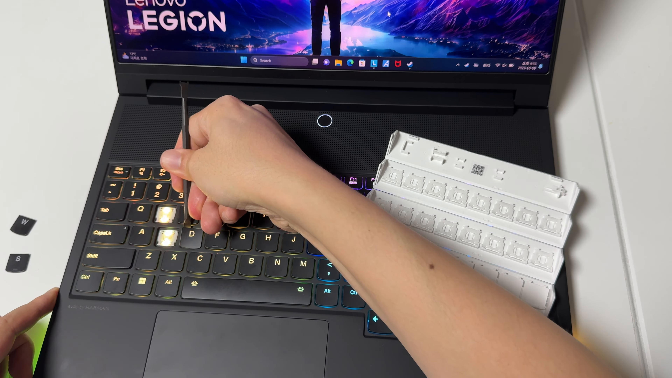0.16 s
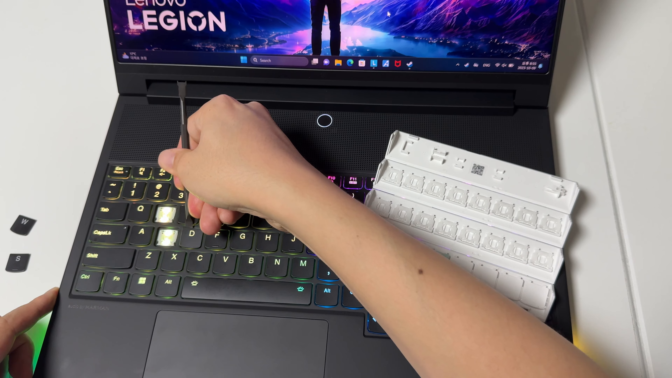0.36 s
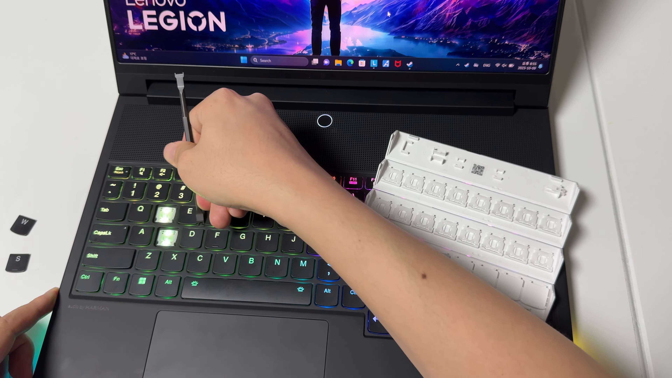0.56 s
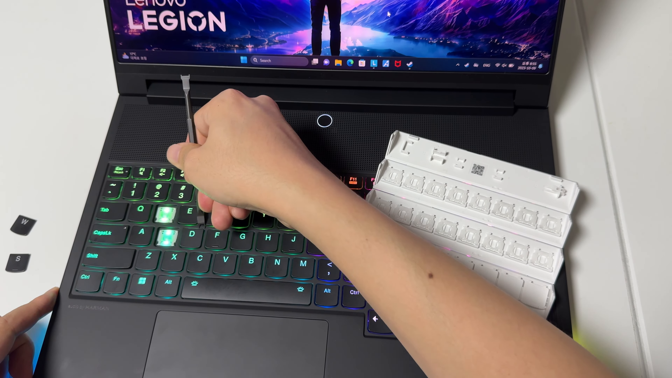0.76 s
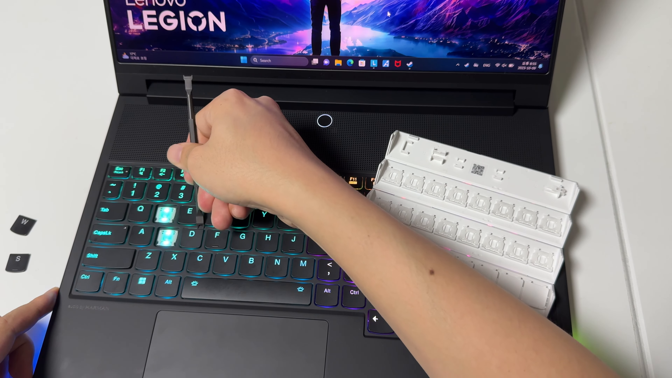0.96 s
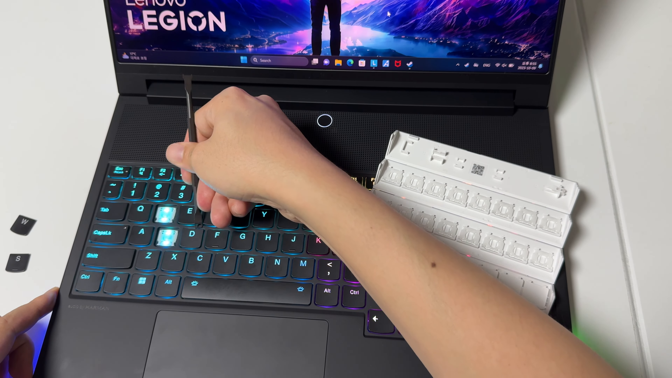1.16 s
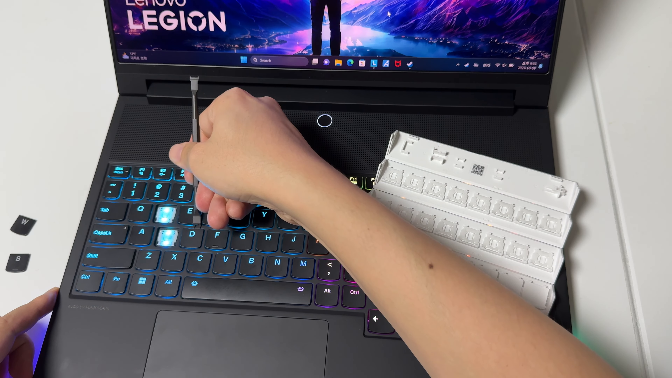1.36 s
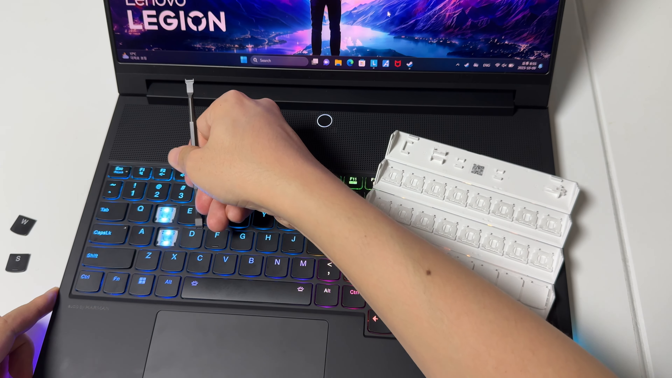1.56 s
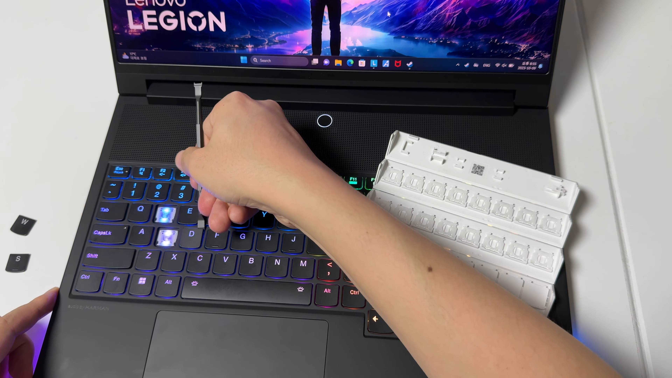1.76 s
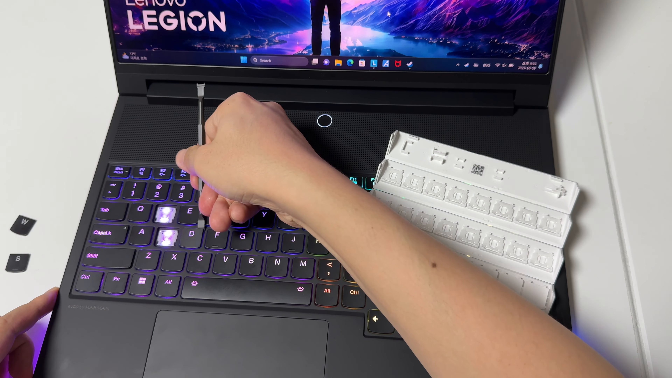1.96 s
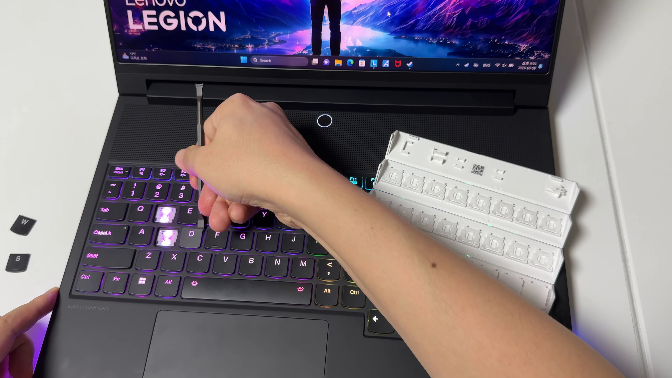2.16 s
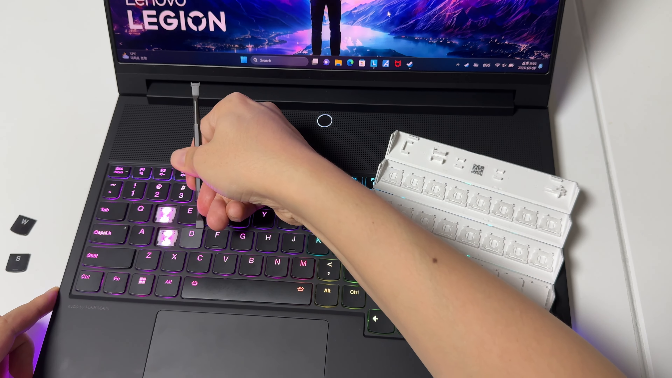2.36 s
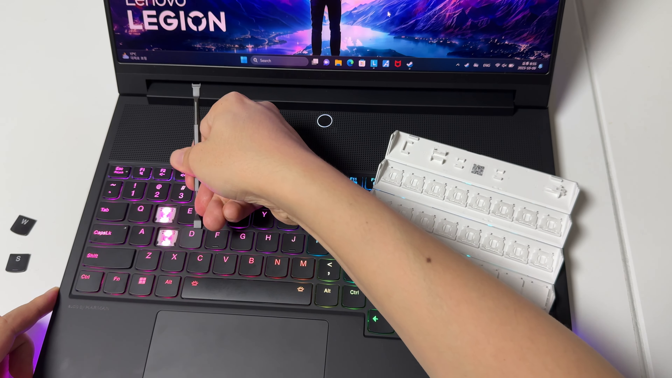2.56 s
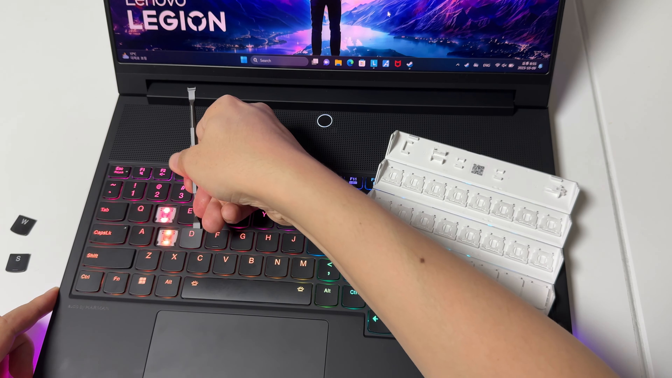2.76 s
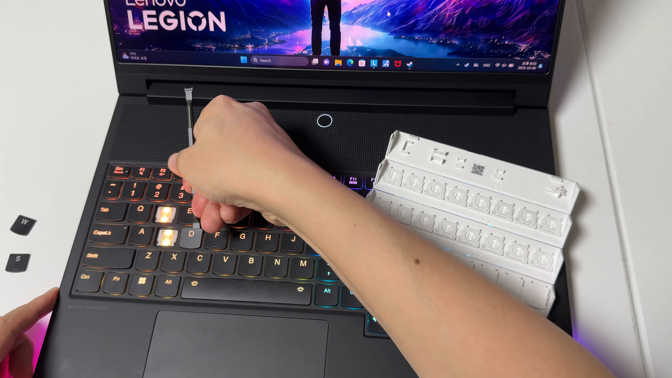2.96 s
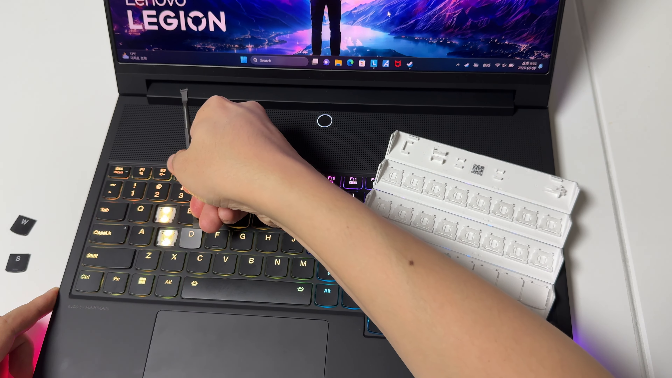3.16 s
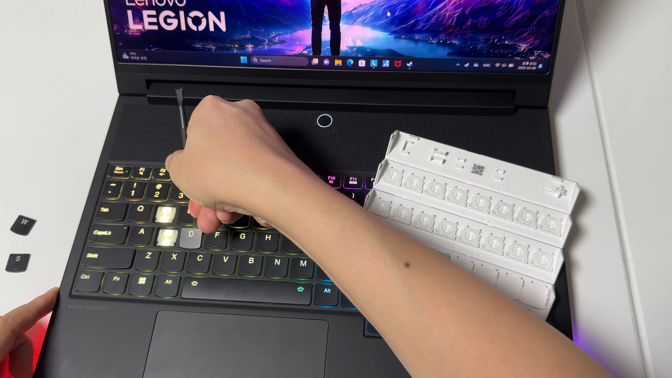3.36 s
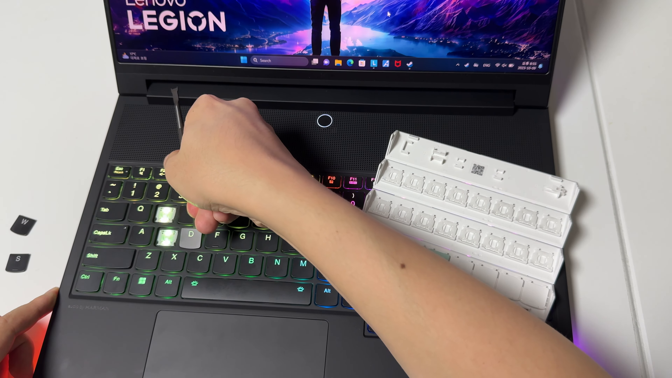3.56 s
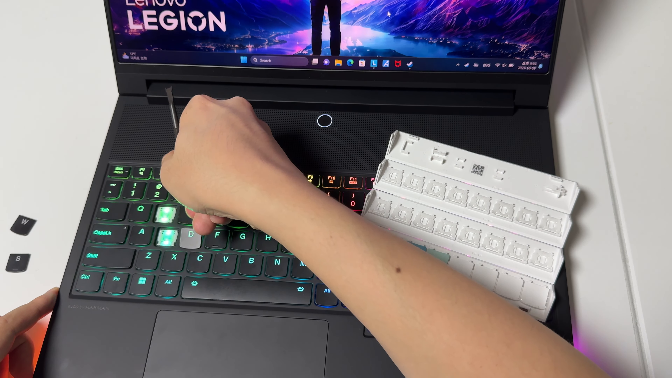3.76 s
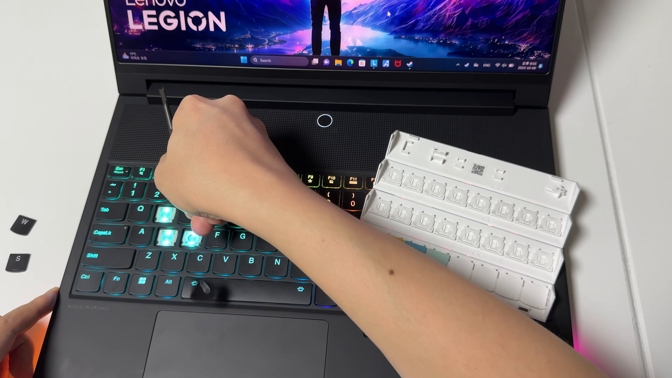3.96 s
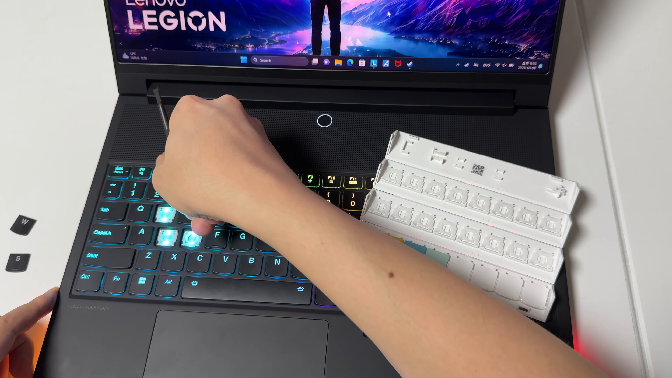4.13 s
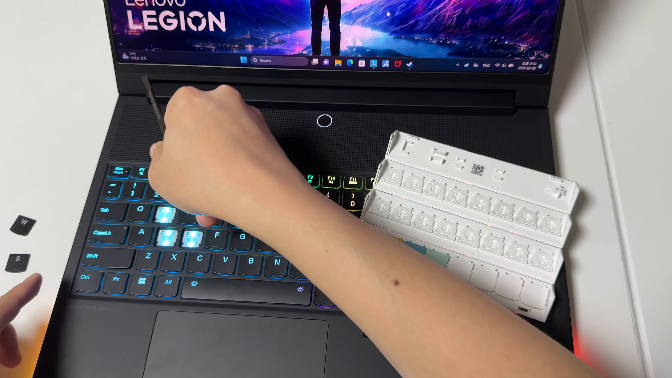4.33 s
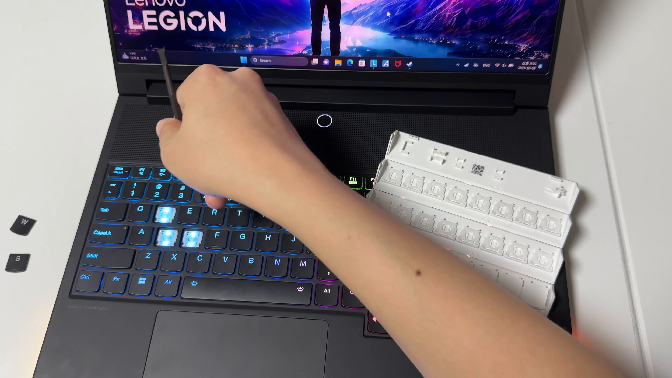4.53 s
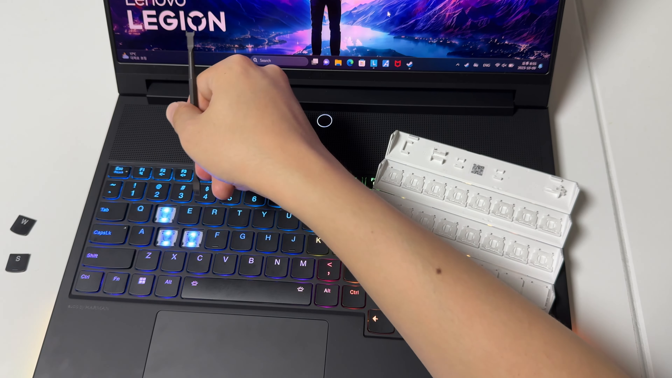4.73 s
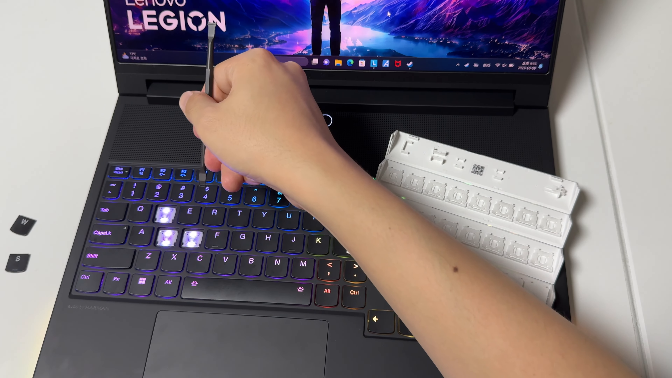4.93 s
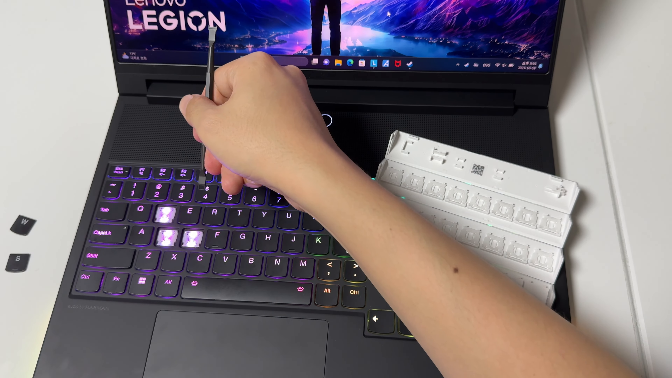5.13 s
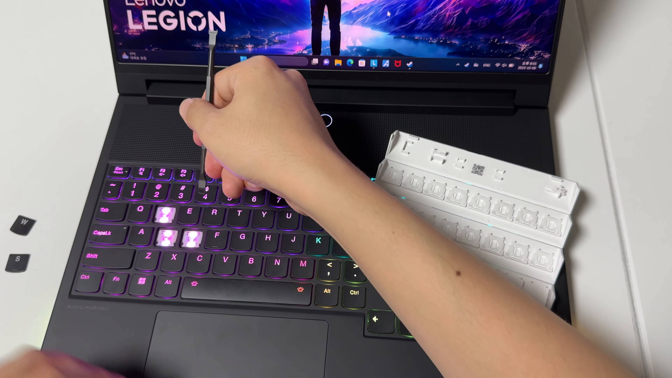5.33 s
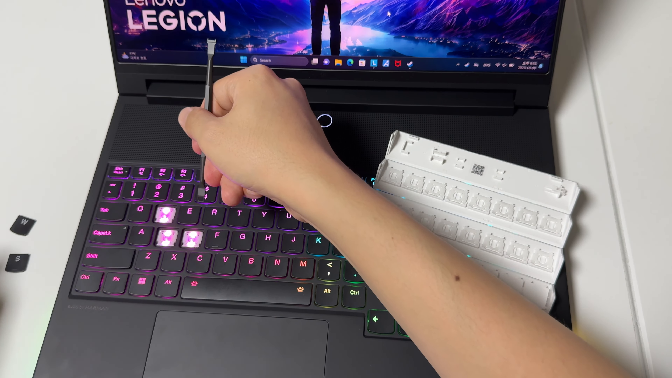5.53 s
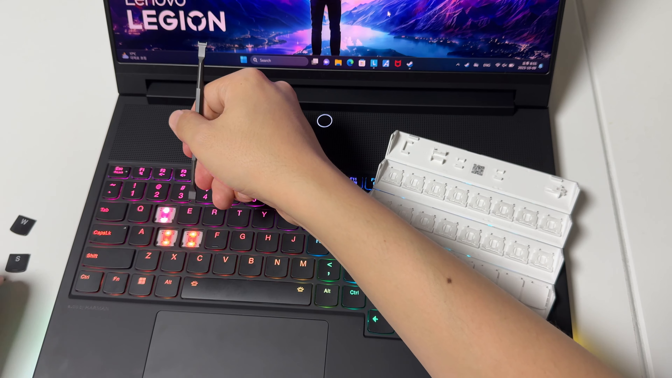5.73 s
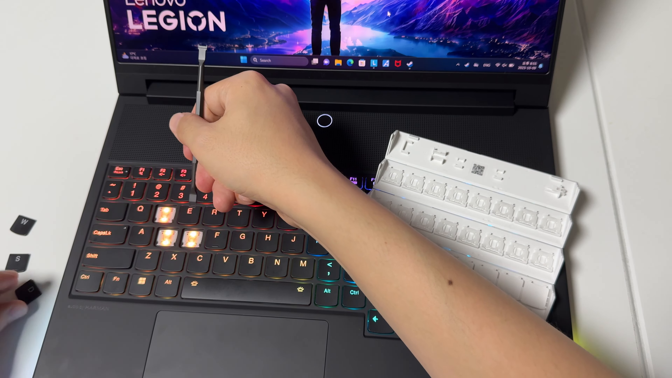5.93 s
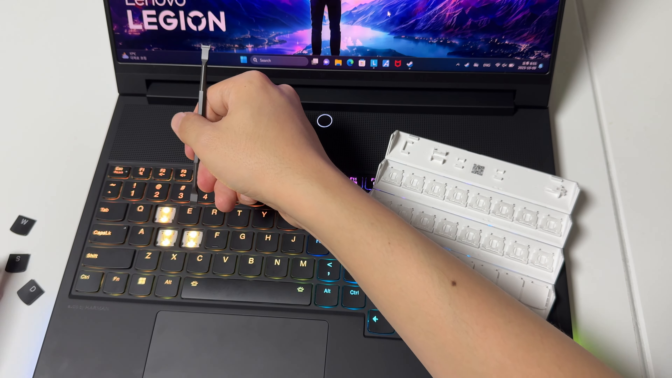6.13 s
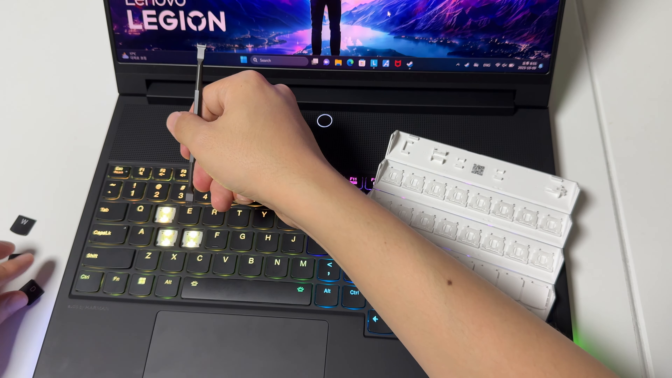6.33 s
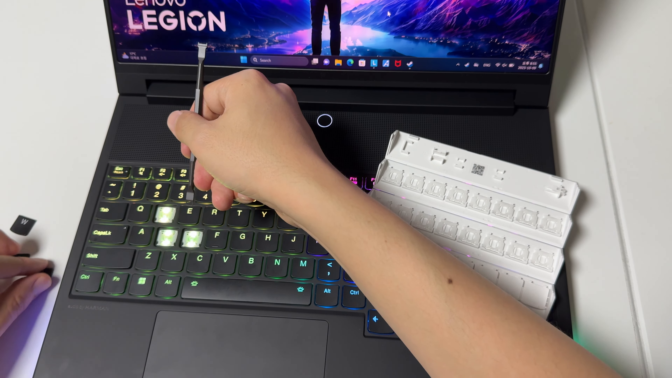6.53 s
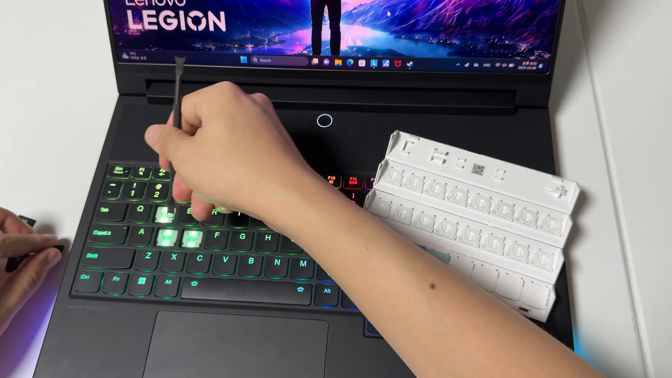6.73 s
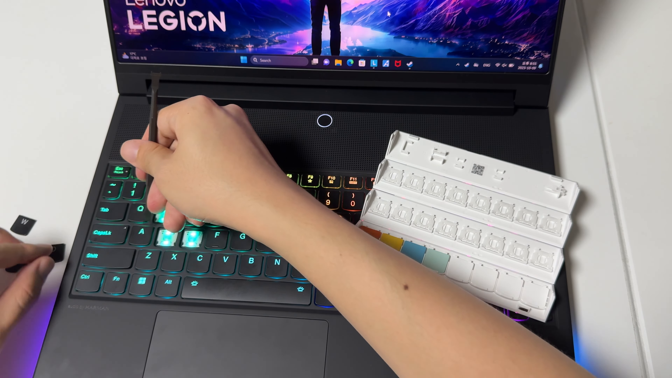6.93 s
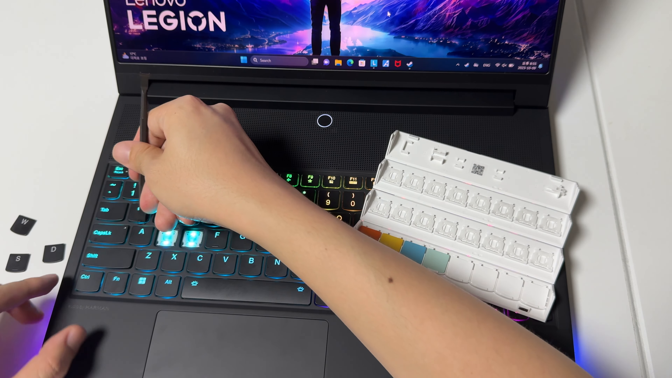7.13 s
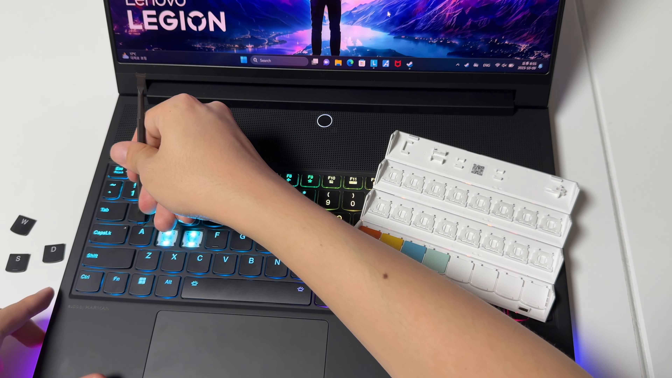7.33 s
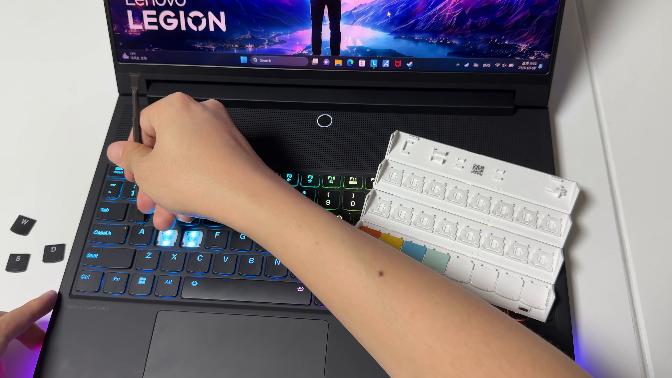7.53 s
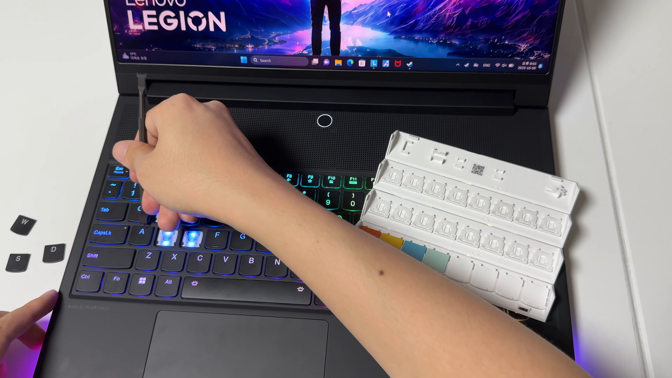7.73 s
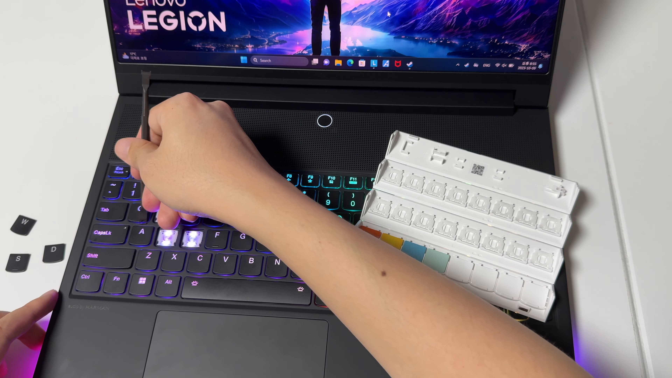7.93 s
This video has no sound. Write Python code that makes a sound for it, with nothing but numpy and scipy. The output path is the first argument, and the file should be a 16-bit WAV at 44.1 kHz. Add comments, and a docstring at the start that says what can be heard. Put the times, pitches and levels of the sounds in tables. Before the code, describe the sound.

Bright plastic clips crack loose in a small quiet room, a light keycap bounces and is later set down and slid, above low fan noise.

```python
"""Keycaps pried off a laptop

A thin steel tool pries keycaps off in a small room: noise ticks ring the keys, plastic clips snap, the deck knocks.
One freed cap bounces over the palm rest, is dropped on the desk and slid aside with a squeak.
Hand pushes and knocks rock the case (low damped modes), strokes brush it (coloured noise); a fan and mains hum run.
Two close microphone ports hear each impact directly and through a tail of fading noise from the room."""
import sys
import numpy as np
from scipy import signal
from scipy.fft import rfft, irfft, next_fast_len
from scipy.io import wavfile
from scipy.ndimage import uniform_filter1d, map_coordinates

SR = 44100
rng = np.random.default_rng(int(sys.argv[2]) if len(sys.argv) > 2 else 0)


def master_out(mix):
    """Clip the mix to full scale and print it as 16-bit PCM to the path in sys.argv[1]."""
    frames = np.transpose(np.atleast_2d(mix))
    ceiling = np.clip(frames, -1, 1)
    pcm = np.round(ceiling * 32767).astype(np.int16)
    wavfile.write(sys.argv[1], SR, pcm)


N = 352359  # length in samples
HIT = np.arange(SR // 3) / SR  # clock of one short sound, s

# Event levels are relative: each function adds its own gain.
# Clips letting go: start_s, level_db, brightness_db_per_octave, knock_db, favoured_deck_pitch_hz,
# key_ring_db, favoured_key_pitch_hz, clip_ring_db, favoured_clip_pitch_hz
CLIP_SNAPS = [(0.0975, -7, 2.5, -28, 1330, -8, 6410, -7, 9800),
              (1.4444, -40.5, -0.5, -48, 398, -10.5, 6200, 0, 13500),
              (1.7876, -22, 0.5, -43, 2430, -9, 5530, 3, 13400),
              (3.9189, -9.5, -0.5, -28.5, 2430, -6, 5840, -1, 13320),
              (5.328, -29, 2.5, -60, 2400, -7, 7720, 0, 11700)]
# The tool tip ticking on keys: start_s, level_db, brightness_db_per_octave, knock_db,
# favoured_deck_pitch_hz, key_ring_db
TOOL_TICKS = [(0.3565, -48, 1.5, -45, 675, -27), (0.44, -58, -9, -57, 700, -23),
              (0.4521, -59, -7, -49, 770, -20), (0.9898, -47.5, -2.5, -53.5, 2050, -19),
              (1.272, -51, -2.5, -50, 720, -22), (1.5285, -52.5, 6, -55, 300, -17),
              (1.724, -61, -7.5, -50, 396, -17), (2.6169, -52, 0.5, -53.5, 700, -17),
              (4.724, -51, -7, -73, 500, -12), (4.745, -48.5, -5, -55.5, 500, -9),
              (4.897, -59.5, -9, -67, 700, -1), (4.9068, -64.5, -8, -76, 696, 4),
              (5.081, -53.5, -5.5, -67, 1800, -5), (5.165, -47, 0, -81, 700, -13),
              (5.7487, -50.5, -15.5, -55, 500, 0.5), (6.4097, -57, -3, -56.5, 2040, -22),
              (6.7229, -48, -4, -72, 696, -4.5), (7.9032, -49.5, -0.5, -74, 701, -10)]
# Corners of the loose cap landing, on the laptop and later on the desk: start_s, level_db,
# brightness_db_per_octave, shell_ring_db, favoured_shell_pitch_hz
CAP_LANDINGS = [(4.0328, -27, 0, 6.5, 5760), (4.0386, -21, 2, 8, 12830), (4.0422, -23, 2.5, 9, 15470),
                (4.1082, -31.5, -7.5, -10, 5835), (4.1119, -28.5, -1.5, 12, 14080),
                (4.187, -26, 0.5, 8, 15470), (4.1944, -22.5, -1, 5.5, 12470), (4.197, -21, 1, 3.5, 15470),
                (4.207, -28, -1, 5, 15470), (4.2415, -37, 3, 1, 14080), (4.2483, -31, -5, 3, 15470),
                (4.2538, -29, -1.5, 5, 11400), (4.259, -41, -2.5, 13, 14080), (4.269, -43, 0, 10, 14080),
                (4.2839, -24, 4, -6, 15470), (4.2957, -52, 1, 1, 4450), (4.3083, -41.5, -7.5, -1, 4450),
                (4.3216, -37.5, -4, -9, 5835), (4.424, -54.5, -7, 5, 12600),
                (5.9194, -47.5, -5.5, 11.5, 6000), (5.926, -26, -2.5, -6, 3870),
                (5.9289, -50.5, -7.5, 20, 12800), (5.951, -45, -8, 3.5, 5835), (5.968, -44.5, -1, 2, 5835),
                (6.786, -54, -8, 0, 4450), (6.7908, -35, -4, 0.5, 11700), (6.794, -42, -4, 3, 5500),
                (6.814, -39, -6, -6, 5200), (6.8175, -36.5, -1, -2, 11700), (6.825, -42.5, -3, 2, 4900)]
# Colour of a sharp contact, as in a clip's crack: pitch_hz, level_db
CRACK_COLOUR = [(200, -38), (1000, -26), (1800, -19), (2800, -13), (3850, -16.5), (4900, -10.5),
                (6400, -10.5), (7600, -8.5), (9000, -3), (10000, 2), (11800, -4), (13000, -3.5),
                (15500, -5.5), (17000, -19.5)]
# Ringing of a key still in its seat: pitch_hz, level_db, fade_by_60_db_s
KEY_MODES = [(3080, -10, .008), (3700, -13, 0.0058), (4647, -11, .007), (5090, -1.5, 0.0061),
             (5940, -1.5, 0.0054), (6400, -1, 0.0066), (7050, -4.5, 0.0054), (7740, -4.5, .005)]


def amp(db):
    """Decibels to gain."""
    return 10 ** (np.asarray(db) / 20)


def unit(x):
    """Scale to an rms of 1."""
    return x / np.sqrt(np.mean(x ** 2) + 1e-20)


def unit_energy(x):
    """Scale to a summed square of 1."""
    return x / np.sqrt(np.sum(x ** 2) + 1e-20)


def along(points, hz):
    """Read a curve of (pitch_hz, value) points on a log pitch axis."""
    point_hz, value = np.transpose(points)
    return np.interp(np.log(hz + 1), np.log(point_hz), value)


def filtered(x, response):
    """Multiply the spectrum of x by a response that depends on frequency."""
    length = x.shape[-1]
    padded = next_fast_len(length + 2048)
    spectrum = rfft(x, padded) * response(np.fft.rfftfreq(padded, 1 / SR))
    return irfft(spectrum, padded)[..., :length]


def coloured(x, spectrum, tilt=0, size=2048):
    """Colour x without any sound ahead of its cause; tilt is in dB per octave, flat below 1 kHz."""
    hz = np.fft.rfftfreq(size, 1 / SR)
    level_db = along(spectrum, hz) + tilt * np.log2(np.maximum(hz, 1000) / 8000)
    # folding the cepstrum forward makes the filter minimum phase
    cepstrum = irfft(np.log(amp(level_db)))
    cepstrum[1:size // 2] *= 2
    cepstrum[size // 2 + 1:] = 0
    impulse = irfft(np.exp(rfft(cepstrum)))
    return signal.fftconvolve(x, impulse)[:len(x)]


def wobble(rate):
    """A smooth random curve through rate random points a second."""
    knots = rng.standard_normal(int(N * rate / SR) + 4)
    return map_coordinates(knots, [np.arange(N) * rate / SR])


def add(track, s, sound):
    """Mix a stereo sound into the track at s seconds."""
    start = max(round(s * SR), 0)
    track[:, start:start + sound.shape[1]] += sound[:, :max(N - start, 0)]


def ring(modes, scatter_db, attack, tilt=0, strike_hz=1, width_hz=1, favour_db=0):
    """Fading tones of unit total energy; the point of impact favours those near strike_hz."""
    hz, db, t60 = np.transpose(modes)[:, :, None]
    strength_db = db + tilt * np.log2(hz) + scatter_db * rng.standard_normal(hz.shape)
    strength_db = strength_db + favour_db * np.exp(-((hz - strike_hz) / width_hz) ** 2)
    phase = 2 * np.pi * (hz * HIT + rng.random(hz.shape))
    fading = amp(strength_db - 60 * HIT / t60)
    swelling = 1 - np.exp(-HIT / attack)
    return unit_energy((fading * np.sin(phase) * swelling).sum(0))


def contact(spectrum, tilt, t60, attack, click_db):
    """A sharp release plus brief noise, evened in spectrum and then coloured; of unit energy."""
    envelope = amp(-60 * HIT / t60) * (1 - np.exp(-(HIT / attack) ** 2))
    push = unit_energy(rng.standard_normal(len(HIT)) * envelope)
    push[int(2 * attack * SR)] += amp(click_db)  # a click of one sample
    z = rfft(push)
    smooth_power = np.abs(uniform_filter1d(np.abs(z) ** 2, size=200))
    even = irfft(z / np.sqrt(smooth_power + 1e-12), len(HIT))
    even = even * (HIT < HIT[-1] / 2)  # drop what wraps round to the end
    return unit_energy(coloured(even, spectrum, tilt))


def all_round(spectrum, tilt):
    """A contact as the walls receive it: summed over all directions, its spectrum is smooth."""
    return unit_energy(coloured(signal.unit_impulse(len(HIT)), spectrum, tilt))


def bending(x):
    """Bending waves cross the deck more slowly the lower they are, so a knock falls in pitch."""
    lag_cycles = 1.0  # delay in s is lag_cycles / (hz + 100)
    return filtered(x, lambda hz: np.exp(-2j * np.pi * lag_cycles * np.log1p(hz / 100)))


def diffuse(pair, spectrum):
    """Turn two unrelated signals into sound from all around, most alike at the ports in the bass."""
    # left-right likeness: pitch_hz, correlation (1 alike, 0 unrelated, below 0 opposed)
    likeness = [(70, 0.73), (140, 1), (300, 0.31), (550, -0.24), (1200, -0.07), (4000, 0)]
    # balance of the ports: pitch_hz, left_minus_right_db
    balance = [(100, 0.43), (300, 2.5), (5000, 3.2), (12000, 0.93)]

    def mid_side(hz):
        angle = np.arccos(np.clip(along(likeness, hz), -1, 1)) / 2
        return amp(along(spectrum, hz)) * [np.cos(angle), np.sin(angle)]

    mid, side = filtered(pair, mid_side)
    ports = np.array([mid + side, mid - side])
    return filtered(ports, lambda hz: amp(np.outer([.5, -.5], along(balance, hz))))


def direct(x, shade):
    """The straight path to the two ports; the hand shades the right one."""
    # level difference, multiplied by shade: pitch_hz, left_minus_right_db
    shadow = [(150, 2.5), (1000, 1.1), (2000, 8), (3500, 5.2), (6000, 5.5), (8000, 5), (9500, 1.8),
              (12000, 1)]
    # phase difference: pitch_hz, left_lead_radians
    lead = [(1000, 0), (5000, -.3), (8000, -2.7), (9500, -3.4), (16000, -5.7)]

    def port(hz, side):
        return amp(side * shade * along(shadow, hz)) * np.exp(1j * side * along(lead, hz))

    return filtered(x, lambda hz: np.array([port(hz, .5), port(hz, -.5)]))


def room(x):
    """Echoes from desk and walls: a fresh noise tail that fades at its own pace in each band."""
    # fading time: pitch_hz, fade_by_60_db_s
    fade = [(150, 0.5), (1000, 0.28), (5000, 0.23), (15000, 0.2)]
    # colour of the tail: pitch_hz, level_db
    tail_colour = [(150, -3), (1200, -0.5), (2400, 1), (3600, -3.5), (5200, -2), (6500, -1), (7700, -6.5),
                   (9000, -18.5), (15000, -14.5)]
    hz, t, z = signal.stft(rng.standard_normal((2, len(HIT))), SR, nperseg=256)
    z = z * amp(-60 * t / along(fade, hz)[:, None])
    tail = signal.istft(z, SR, nperseg=256)[1][:, :len(HIT)]
    tail = np.sqrt(2) * unit_energy(tail * (1 - np.exp(-HIT / 0.00094)))
    echoes = signal.fftconvolve(x[None], tail, axes=1)[:, :len(x)]
    return diffuse(echoes, tail_colour)


def fan():
    """Steady air noise from all around, with slightly unsteady mains and motor tones."""
    # colour of the air noise: pitch_hz, level_db_per_hz (relative)
    air_colour = [(20, -35), (30, -15.5), (42, 0), (120, 1), (240, 0), (315, 6.5), (420, -3.5), (620, -4),
                  (770, -10), (910, -7), (1400, -15), (2200, -22), (5300, -37.5), (7200, -27.5),
                  (9300, -48.5), (12500, -41.5), (16000, -55)]
    # tones: pitch_hz, level_db, drift_radians
    hum_tones = [(121.9, -70.5, 0.29), (293.7, -68.5, 0.38), (348, -75.5, 1)]
    air_level = amp(-61.0 + 0.47 * wobble(5.0))
    air = air_level * unit(diffuse(rng.standard_normal((2, N)), air_colour))
    t = np.arange(N) / SR
    tones = np.zeros(N)
    for hz, db, drift in hum_tones:
        level = np.sqrt(2) * amp(db + 2 * drift * wobble(1.9))  # sqrt(2) turns rms into peak
        tones += level * np.sin(2 * np.pi * hz * t + drift * wobble(8))
    return air + direct(tones, shade=0.93)


def rubs():
    """Strokes of fingers, tool tip and skidding cap: tiny slips of uneven size under a smooth swell."""
    # strokes: middle_s, length_s, level_db, brightness_db_per_octave
    strokes = [(1.002, 0.088, -70, -15.5), (1.416, 0.055, -73, 0), (1.488, 0.12, -80, 2),
               (2.363, 0.037, -74, 0), (4.39, 0.18, -73, -4), (4.75, 0.086, -68.5, -2.5),
               (5.106, 0.068, -71, 7), (5.154, 0.036, -68, 1.5), (5.96, 0.057, -59, -1),
               (6.438, 0.28, -75, -12.5), (6.624, 0.18, -73.5, -6), (7.262, 0.072, -71.5, 4.5),
               (7.72, 0.052, -71.5, 2), (7.877, 0.097, -74.5, 5)]
    # colour of skin and plastic sliding: pitch_hz, level_db
    rub_colour = [(300, -0.5), (1500, -3.5), (4000, 5.5), (8000, -1.5), (11000, 6), (15000, 6), (17000, -8)]
    # the tip also scrapes over the key around each contact; lag is to the middle of the scrape
    scrape_db, scrape_s, scrape_lag_s = -82, .06, 0.022
    scrapes = [(s + scrape_lag_s, scrape_s, scrape_db, tilt) for s, _, tilt, *_ in CLIP_SNAPS + TOOL_TICKS]
    track = np.zeros((2, N))
    for middle, length, db, tilt in strokes + scrapes:
        slips = rng.standard_normal(len(HIT)) * amp(5.2 * rng.standard_normal(len(HIT)))
        swell = np.sin(np.pi * np.minimum(HIT / length, 1))
        stroke = swell * unit(coloured(slips, rub_colour, tilt))
        add(track, middle - length / 2, amp(db) * (direct(stroke, shade=1.0) + amp(1.0) * room(stroke)))
    return track


def snaps():
    """A clip lets go with a crack of a few milliseconds; clip and key ring briefly, also into the room."""
    # the tiny plastic clips under a key: pitch_hz, level_db, fade_by_60_db_s
    clip_modes = [(9700, 0, .004), (11600, -3, .004), (13000, -2, .005), (13600, -3, .005),
                  (14950, -2, .004)]
    ring_send_db = -8.5  # how much of the ringing reaches the walls
    track = np.zeros((2, N))
    for s, db, tilt, _, _, key_db, key_hz, clip_db, clip_hz in CLIP_SNAPS:
        crack = contact(CRACK_COLOUR, tilt, t60=0.0043, attack=0.0004, click_db=-1.0)
        key = amp(key_db) * ring(KEY_MODES, scatter_db=0.5, attack=0.0004,
                                 strike_hz=key_hz, width_hz=450, favour_db=11.5)
        clip = amp(clip_db) * ring(clip_modes, scatter_db=1.0, attack=0.00035,
                                   strike_hz=clip_hz, width_hz=900, favour_db=7)
        near = direct(crack + clip, shade=1.0) + direct(key, shade=2.1)
        crack_tail = room(amp(3.0) * all_round(CRACK_COLOUR, tilt))
        ring_tail = amp(ring_send_db) * room(key + amp(5) * clip)
        add(track, s, amp(db + 12.0) * (near + crack_tail + ring_tail))
    return track


def knocks():
    """Snaps, ticks and landings knock the deck: a dull thud and hollow modes, the low ones swelling last."""
    # the laptop's deck: pitch_hz, level_db, fade_by_60_db_s
    deck_modes = [(300, 6.5, 0.061), (450, -7, .06), (551.8, -0.5, .09), (660, -2.5, 0.04), (780, 0, 0.04),
                  (904, -2.5, 0.13), (1008, -1.5, 0.089), (1194, -4, 0.09), (1230, -1.5, 0.058),
                  (1314, 3, .09), (1420, 0, 0.069), (1560, -2.5, .04), (2040, -6.5, 0.077), (2360, -7, .1),
                  (2620, -9, .09), (2790, -11, 0.065)]
    # colour of the dull thud: pitch_hz, level_db
    thud_colour = [(80, -16), (300, 1), (500, -5), (780, 2.5), (1300, -1.5), (1750, -1.5), (2600, -6.5),
                   (4000, -21), (12000, -43)]
    cap_knock_db, cap_knock_hz = -24, 2400  # the light cap: level against its landing, favoured pitch
    knock_tilt = -2.5  # dB per octave
    swell_cycles = 0.9  # cycles that each mode takes to swell
    swell = swell_cycles / np.array(deck_modes)[:, :1]
    blows = [(s, db, hz) for s, _, _, db, hz, *_ in CLIP_SNAPS + TOOL_TICKS]
    blows += [(s, db + cap_knock_db, cap_knock_hz) for s, db, *_ in CAP_LANDINGS]
    track = np.zeros((2, N))
    for s, db, hz in blows:
        thud = bending(contact(thud_colour, knock_tilt, t60=0.076, attack=0.0017, click_db=-14.5))
        hollow = ring(deck_modes, scatter_db=2.0, attack=swell, tilt=knock_tilt,
                      strike_hz=hz, width_hz=570, favour_db=12.0)
        deck = bending(amp(8.5) * hollow)
        tail = room(amp(-4.0) * thud + amp(-7) * deck)
        add(track, s, amp(db + 9.5) * (direct(thud + deck, shade=0.614) + tail))
    return track


def bumps():
    """Hand pushes and low thumps after some knocks, and the recoil of each snap or tick, rock the case."""
    # low bumps of the case: start_s, level_db
    case_bumps = [(0.494, -53), (1.456, -51), (1.528, -43), (1.736, -54), (1.798, -49), (1.831, -50),
                  (2.625, -46.5), (4.27, -43.5), (4.438, -50), (4.681, -43), (5.759, -47.5)]
    # the whole case rocking on the desk: pitch_hz, level_db, fade_by_60_db_s
    case_modes = [(69.4, -14.5, .14), (95, -5.5, 0.11), (120, 1, 0.073), (203, -5, 0.11), (318, -2, 0.078)]
    # a knock of soft_db rocks the case at rock_db; rock_grows is dB gained per dB of knock
    soft_db, rock_db, rock_grows, rock_lag_s = -50, -55.5, 0.97, 0.007
    recoils = [(s + rock_lag_s, rock_db + rock_grows * (db - soft_db))
               for s, _, _, db, *_ in CLIP_SNAPS + TOOL_TICKS]
    track = np.zeros((2, N))
    for s, db in case_bumps + recoils:
        rock = ring(case_modes, scatter_db=2, attack=0.0079)
        add(track, s, amp(db + 20.0) * (direct(rock, shade=0.7153) + amp(-6.5) * room(rock)))
    return track


def ticks():
    """The tool tip grazes a key: a softer, slightly longer contact that rings the key's low modes."""
    track = np.zeros((2, N))
    for s, db, tilt, _, _, key_db in TOOL_TICKS:
        tick = contact(CRACK_COLOUR, tilt, t60=0.013, attack=.0008, click_db=-38)
        key = amp(key_db) * ring(KEY_MODES, scatter_db=4.5, attack=0.00023,
                                 strike_hz=3700, width_hz=830, favour_db=22.5)
        tail = room(amp(4.5) * all_round(CRACK_COLOUR, tilt) + amp(-1.5) * key)
        add(track, s, amp(db + 11.5) * (direct(tick + key, shade=1.0) + tail))
    return track


def bounces():
    """The light cap lands on corner after corner; each contact rings its shell differently."""
    # the free cap's shell: pitch_hz, level_db, fade_by_60_db_s
    shell_modes = [(2370, -44, 0.023), (2764, -20.5, 0.045), (3970, -12.5, 0.023), (4413, -10, 0.04),
                   (4880, -19, 0.014), (5740, -4, 0.021), (5850, -9, 0.077), (6200, -19, 0.021),
                   (8020, -6, 0.033), (11200, 4, 0.013), (11930, 5, 0.0087), (13050, 6, 0.015),
                   (14080, 5.5, 0.014), (15480, -2, 0.02)]
    track = np.zeros((2, N))
    for s, db, tilt, shell_db, shell_hz in CAP_LANDINGS:
        tap = contact(CRACK_COLOUR, tilt, t60=.008, attack=.0004, click_db=-6)
        shell = amp(shell_db) * ring(shell_modes, scatter_db=2.0, attack=0.00014, tilt=tilt,
                                     strike_hz=shell_hz, width_hz=260, favour_db=13.5)
        tail = room(amp(1.6) * all_round(CRACK_COLOUR, tilt) + amp(-5) * shell)
        add(track, s, amp(db + 7.5) * (direct(tap + shell, shade=1.0) + tail))
    return track


def squeaks():
    """A finger slides the cap over the desk: uneven stick and slip keeps its narrow resonances alive."""
    # squeaks: start_s, length_s, level_db, highest_pitch_hz, pitch_sag_at_both_ends_share, width_hz
    slides = [(6.27, 0.31, -83, 8200, .19, 650), (6.29, 0.27, -90, 14100, .17, 550),
              (6.33, 0.2, -91, 11000, .1, 600), (6.558, 0.024, -73, 3700, 0, 1500),
              (6.565, 0.13, -77, 4150, .07, 450), (6.56, 0.14, -81, 9700, .02, 450),
              (6.56, 0.14, -85, 11800, .03, 550)]
    grip_db = 3.5  # the grip comes and goes
    track = np.zeros((2, N))
    for s, length, db, hz, sag, width in slides:
        progress = np.minimum(HIT / length, 1)
        pitch = hz * (1 - sag * (2 * progress - 1) ** 2)
        phase = 2 * np.pi * np.cumsum(pitch) / SR
        # two random curves spread the tone into a narrow band
        tone = wobble(width)[:len(HIT)] * np.cos(phase) + wobble(width)[:len(HIT)] * np.sin(phase)
        grain = unit(amp(grip_db * wobble(154)))[:len(HIT)]
        swell = np.sin(np.pi * progress)
        add(track, s, direct(amp(db) * swell * grain * tone, shade=0.96))
    return track


def scene():
    """All sources at the two ports."""
    return fan() + rubs() + snaps() + knocks() + bumps() + ticks() + bounces() + squeaks()


def record(dry):
    """The recorder drops the deepest rumble and cuts steeply above its band limit."""
    top_hz = 16400
    bass_cut = signal.butter(4, 34, "highpass", fs=SR, output="sos")
    return filtered(signal.sosfilt(bass_cut, dry), lambda hz: 1 / np.sqrt(1 + (hz / top_hz) ** 120))


dry = scene()
out = record(dry)
master_out(out)
```